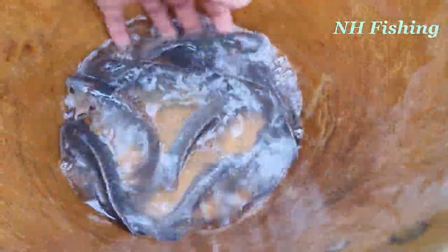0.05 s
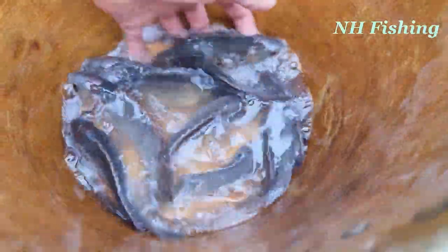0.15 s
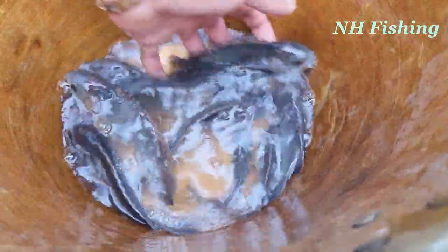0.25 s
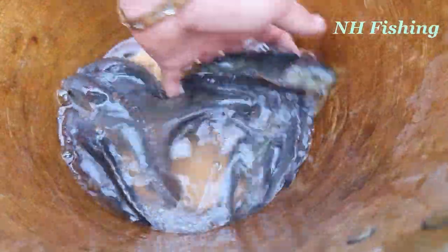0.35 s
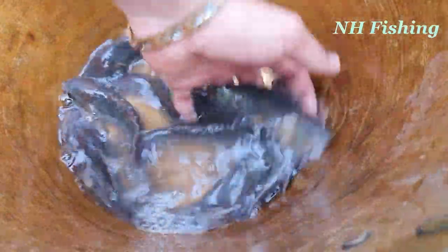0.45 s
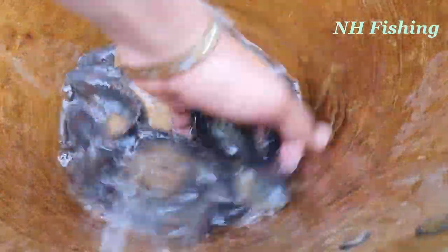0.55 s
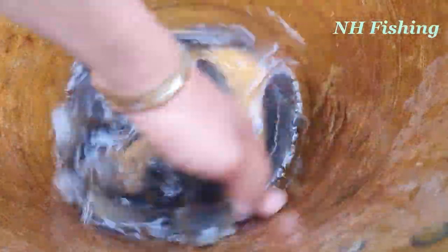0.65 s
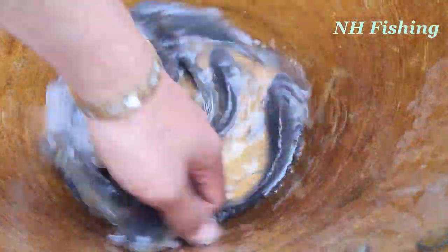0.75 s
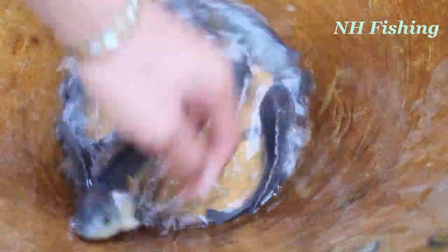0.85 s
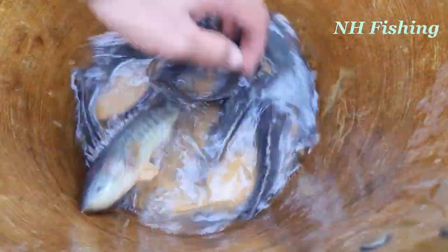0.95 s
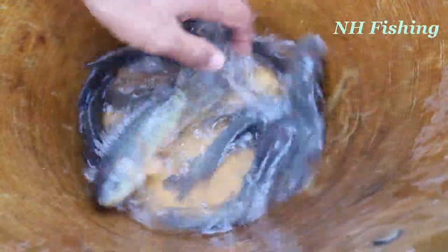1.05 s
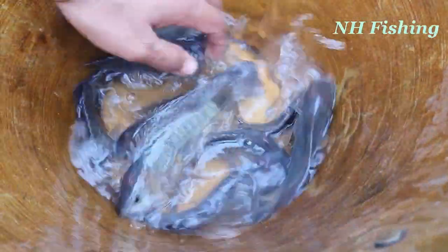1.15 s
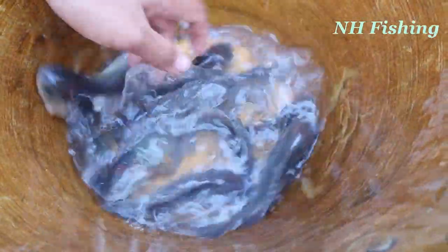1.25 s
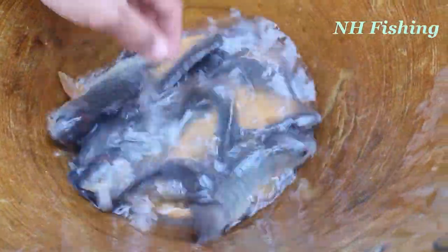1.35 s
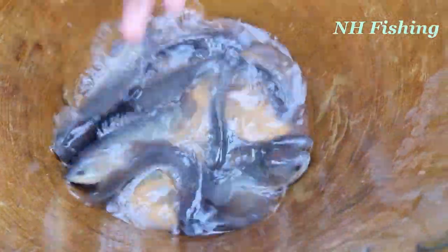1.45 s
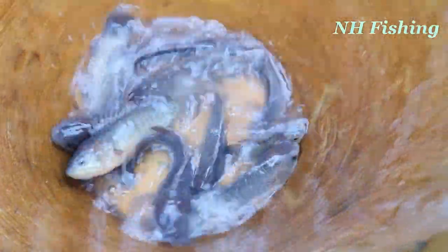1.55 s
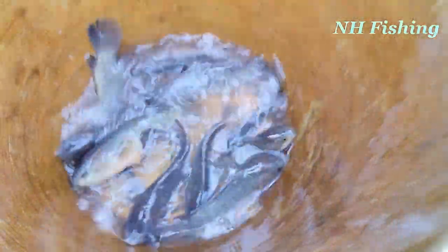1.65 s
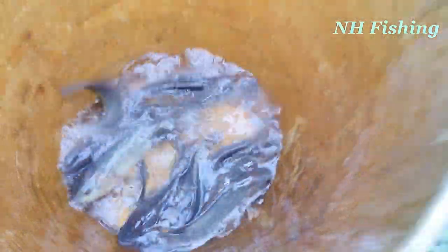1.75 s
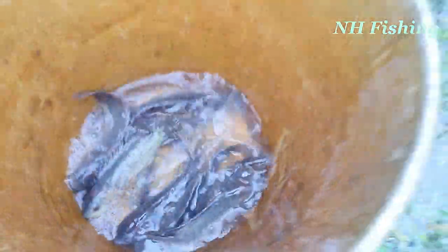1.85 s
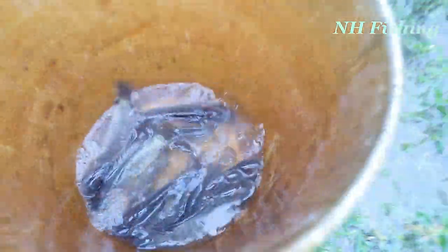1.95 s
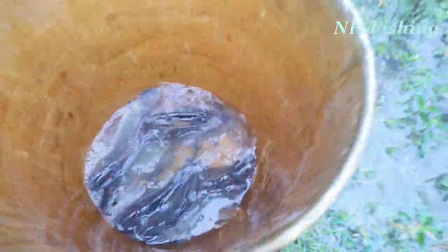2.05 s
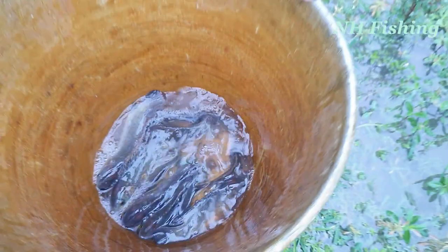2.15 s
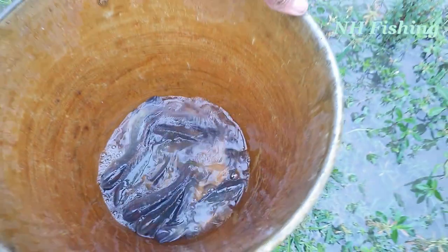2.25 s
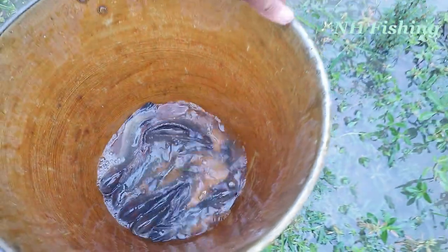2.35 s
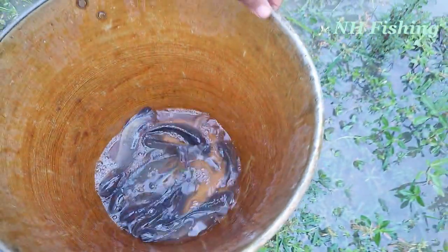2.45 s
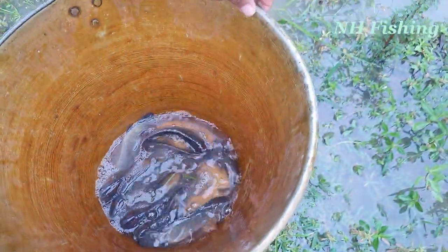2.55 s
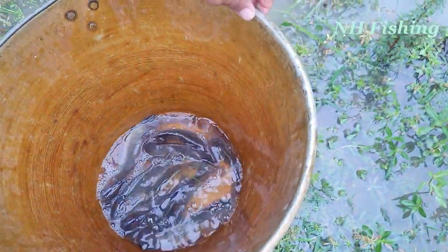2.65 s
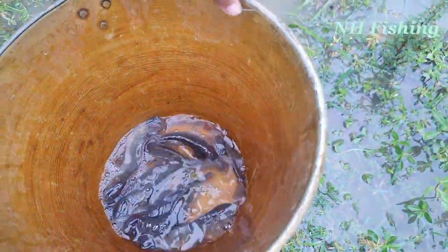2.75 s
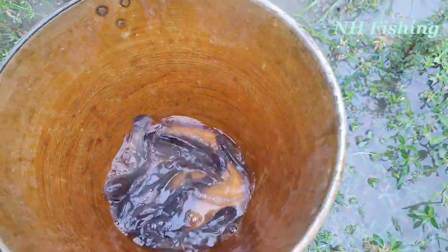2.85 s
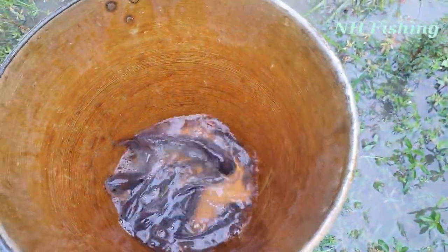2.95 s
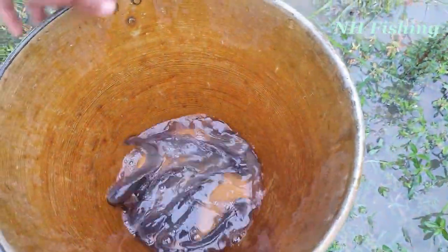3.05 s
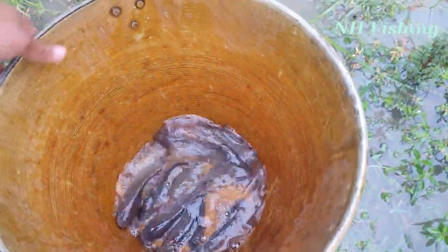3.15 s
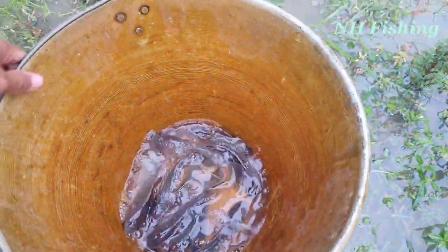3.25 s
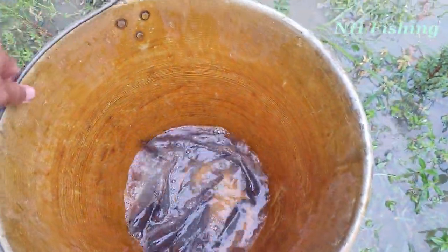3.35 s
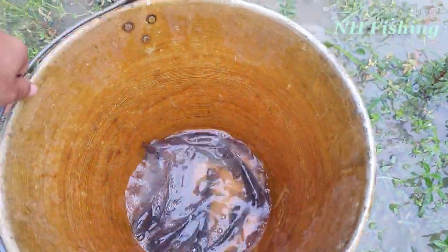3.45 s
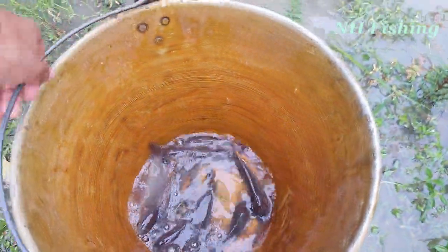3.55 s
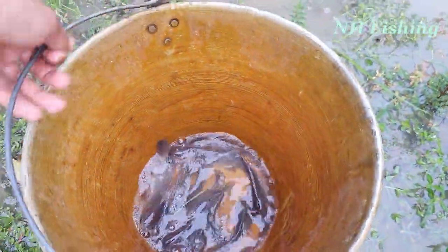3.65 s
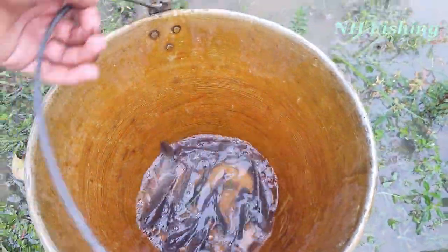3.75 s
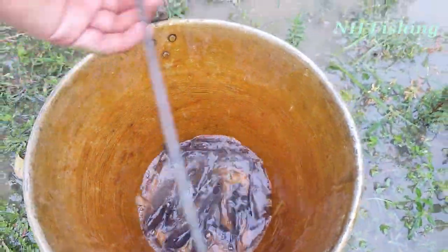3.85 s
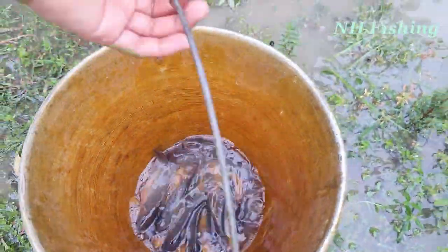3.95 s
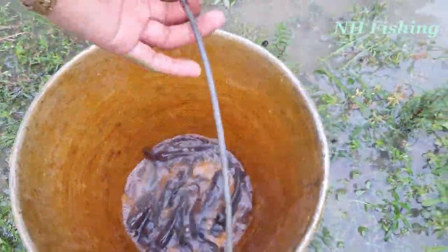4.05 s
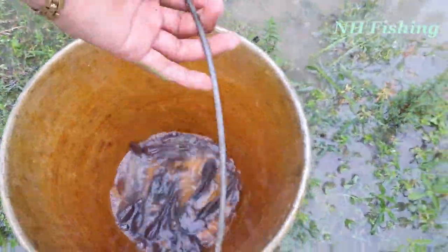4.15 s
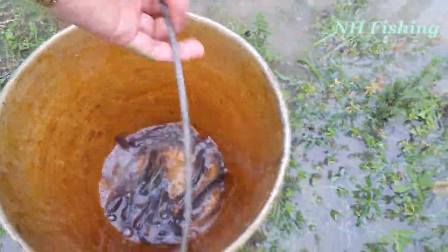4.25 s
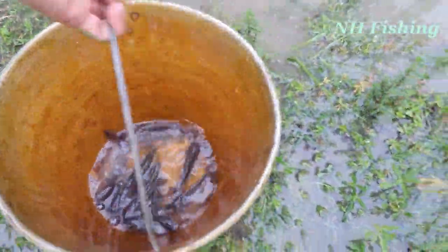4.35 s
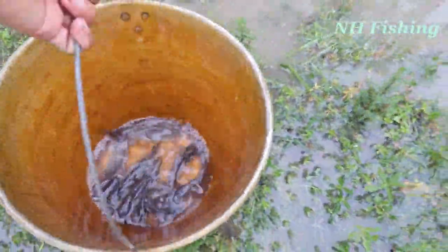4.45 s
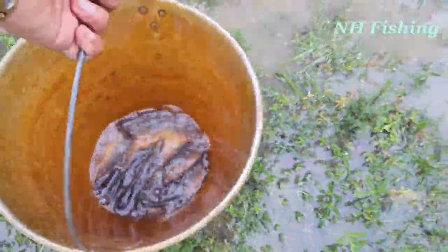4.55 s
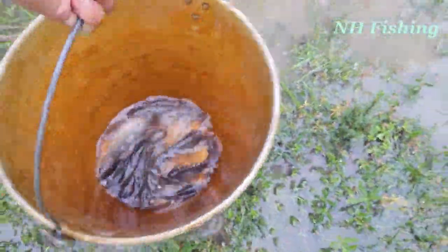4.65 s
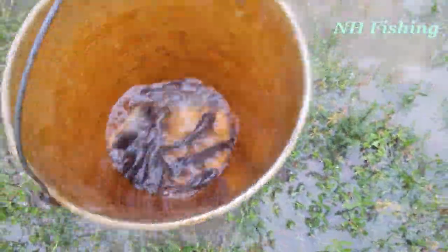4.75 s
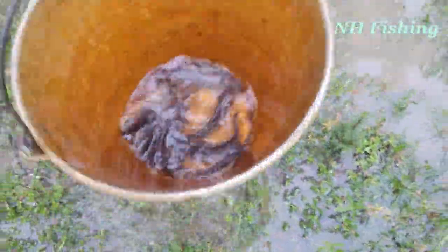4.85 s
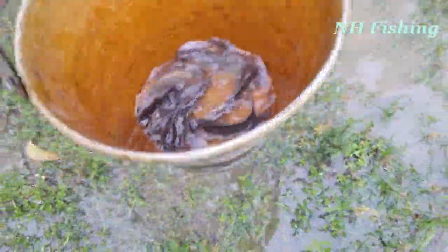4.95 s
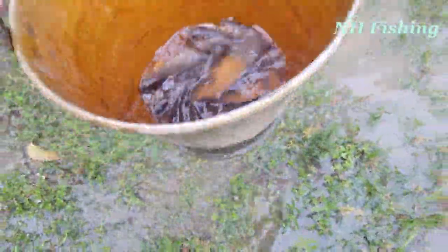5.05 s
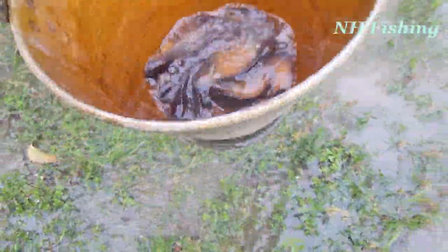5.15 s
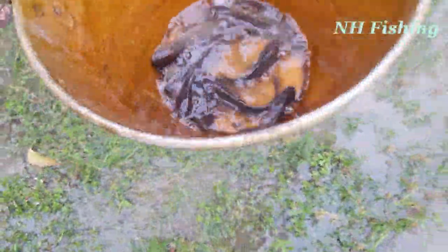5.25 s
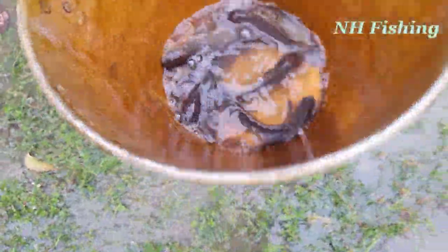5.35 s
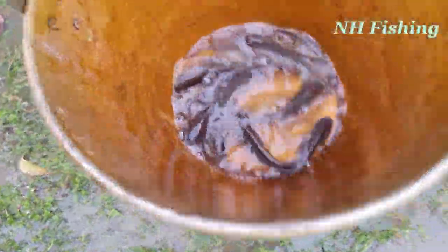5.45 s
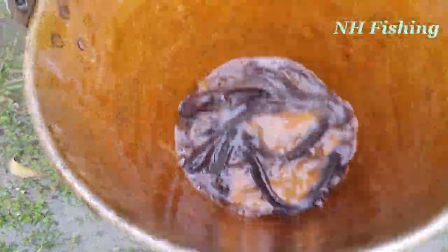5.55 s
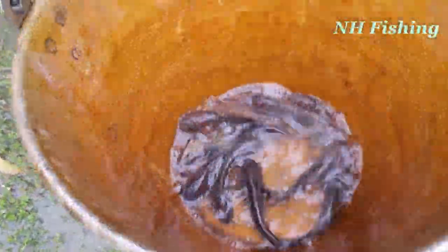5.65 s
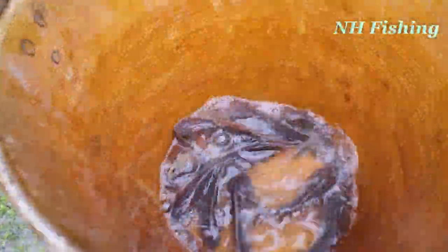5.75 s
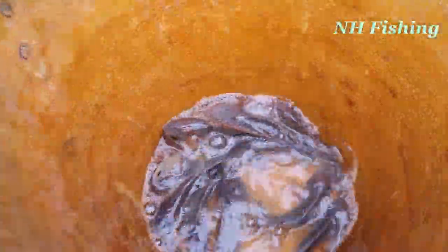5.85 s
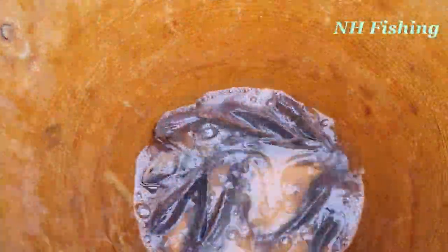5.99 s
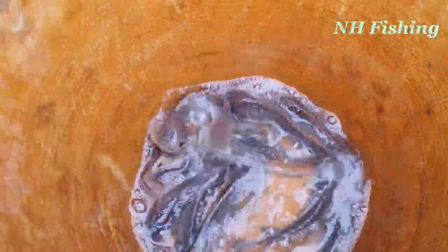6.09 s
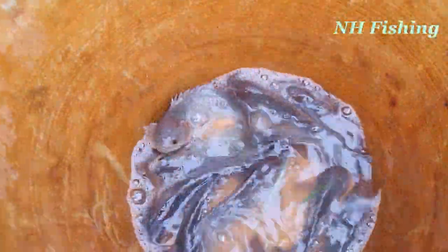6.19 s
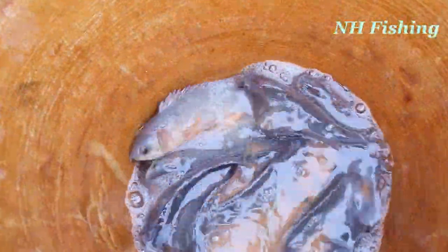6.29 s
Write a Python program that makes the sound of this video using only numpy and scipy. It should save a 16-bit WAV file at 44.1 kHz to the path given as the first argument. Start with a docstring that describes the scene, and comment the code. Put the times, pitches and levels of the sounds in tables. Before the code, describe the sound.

Wet slaps and bubbly splashes of squirming fish in a metal pail, followed by sharp handle clinks and a brief slosh outdoors.

```python
"""In a wet field, amid shrill insects and a low far-off rumble, small live fish squirm, slap and splash
in a little water in a metal bucket while a hand stirs: noise bursts, chirped bubbles, ringing modes.
A thin bird whistle falls at 2.3 s; from 3.5 s the wire handle swings up and clanks in its lugs, and a second
bird sings bending notes. At about 4.35 s the lifted bucket sloshes; the thin whistle returns at 5.3 s
amid the last slaps. The whistles are wavering sines; insects and rumble are filtered noise."""
import sys
import numpy as np
from scipy import signal
from scipy.fft import rfft, irfft, next_fast_len
from scipy.io import wavfile
from scipy.ndimage import uniform_filter1d, map_coordinates

SR = 44100
rng = np.random.default_rng(int(sys.argv[2]) if len(sys.argv) > 2 else 0)


def waveform_to_disk(signal):
    """Save audio, clipped to [-1, 1], as 16-bit WAV at the path in sys.argv[1]."""
    frames = np.transpose(np.atleast_2d(signal))
    scaled = np.clip(frames, -1, 1) * 32767
    samples = np.round(scaled).astype(np.int16)
    wavfile.write(sys.argv[1], SR, samples)


N = 278712

# Levels are relative, before each layer's mix gain.
# Tail slaps and squelches: t/s, splash resonance f/Hz, level/dB, thud/dB, spray/dB (last two re slap)
SLAPS = [(0.139, 2150, -30.5, -20, -31), (0.171, 3080, -32, -11, -27), (0.572, 4500, -29, -30, -10.5),
         (.637, 3000, -27.5, -31, -7), (.703, 3200, -29, -40, -34), (1.084, 3200, -26, -15.5, -22),
         (1.166, 850, -21, -10.5, -40), (1.1805, 3100, -13.5, -42, -16.5), (1.201, 4200, -21.5, -37, -15.5),
         (1.2565, 2370, -18, -33, -21.5), (1.262, 1400, -21, -29, -25), (1.278, 2740, -22, -22.5, -21),
         (1.32, 3000, -26.5, -28, -20), (1.333, 1730, -20, -16.5, -24.5), (1.428, 2100, -38, -30, -10),
         (1.735, 3730, -25.5, -19, -40), (1.921, 3120, -22, -13, -40), (1.9254, 3220, -16, -25, -40),
         (1.954, 3460, -28.5, -14.5, -31), (2.668, 1300, -44.5, -3, -39), (2.77, 2300, -32, -25, -47),
         (2.886, 1580, -30, -10.5, -45), (2.964, 800, -43, -3.5, -40), (3.054, 3520, -37.5, -33, -26),
         (3.226, 5000, -36.5, -14, -20), (4.546, 1000, -39, -4, -24), (5.561, 2100, -35, -30, -23),
         (5.756, 1330, -36.5, -13, -44), (6.046, 4540, -27.5, -32, -22), (6.216, 4570, -25.5, -26.5, -29),
         (6.274, 4080, -29.5, -30.5, -35)]
# Dry snaps of fins and bursting films: t/s, resonance f/Hz, level/dB
SNAPS = [(1.168, 1500, -39), (1.2584, 1210, -31.5), (1.525, 3130, -36), (4.449, 1390, -48),
         (6.307, 1870, -48)]
# Fish striking the bottom: t/s, level/dB
THUMPS = [(1.927, -31.5), (2.889, -46)]
# Hand or heavy body nudging the bucket: t/s, level/dB
BUMPS = [(0.747, -42), (2.801, -41)]
# Modes of the nudged bucket: f/Hz, level/dB, t60/s
BUMP_MODES = [(98, 11.5, 0.058), (261, -3.5, 0.12)]
# Modes of the water-loaded bottom: f/Hz, level/dB, t60/s
BOTTOM_MODES = [(266, -12.5, 0.5), (330, -3.5, 0.33), (474, -17.5, 0.52), (613, -2, 0.19), (1170, -1, .11),
                (1280, -4.5, 0.12)]
# Distinct bubble notes, low gloops to high blips; close rows may form one gloop:
# t/s, birth f/Hz, level/dB
BUBBLES = [(0.151, 315, -32.5), (.649, 1974, -21.5), (1.103, 810, -26.5), (1.114, 1015, -30),
           (1.133, 1140, -28), (1.1805, 3324, -10.5), (1.181, 1130, -23.5), (1.186, 2020, -21),
           (1.2, 3670, -21.5), (1.228, 1676, -18), (1.258, 898, -22.5), (1.261, 2090, -22),
           (1.333, 453, -28.5), (1.471, 3380, -33.5), (1.526, 2395, -23), (2.902, 800, -40),
           (2.985, 760, -46.5), (4.33, 1270, -27.5), (4.346, 2230, -30), (4.395, 1200, -34),
           (4.413, 2500, -39), (4.513, 794, -44), (4.548, 890, -41.5), (4.598, 560, -38.5),
           (4.815, 1780, -37), (6.237, 4750, -27.5)]
# Surges pushed by hand, writhing fish or lifted bucket:
# crest t/s, rise/s, fall/s, squelch level/dB, slosh level/dB, fizz level/dB
SURGES = [(.69, .45, .27, -47, -54, -58.5), (1.006, .06, .06, -45.5, -54.5, -64),
          (1.2, .12, .11, -36, -50, -48), (1.388, 0.066, .22, -46.5, -47.5, -61),
          (3.249, 0.0303, .26, -51, -57, -71), (3.559, .11, .09, -52, -54.5, -78),
          (4.349, .05, .06, -40, -50.5, -46), (4.489, .25, .21, -52.5, -51, -61.5),
          (5.571, .07, .45, -55, -59, -64), (6.29, .09, .1, -51.5, -61, -66)]
# Restless squirming between surges: t/s, squelch level/dB, fizz level/dB
SQUIRM = [(0, -60, -81), (1.7, -60.5, -71), (2.501, -69, -93), (3.301, -59.5, -71), (6.3, -60, -64.5)]
# Handle knocks in the lugs: t/s, wire resonance f/Hz, level/dB, thud/dB re knock, loss per rebound/dB
CLANKS = [(3.479, 2500, -33.5, -16, 5.5), (3.528, 4700, -25, -19.5, 12), (3.5789, 3260, -11, -31, 12),
          (3.692, 2770, -31.5, -21.5, 6), (3.908, 4470, -16.5, -26, 14), (3.967, 4640, -4, -31.5, 7.5),
          (4.166, 5380, -29, -20, 10), (4.269, 3400, -14.5, -30, 5.5), (4.3021, 4830, -8, -27.5, 4)]
# Wire scraping round in a lug: t/s, length/s, level/dB
SCRAPES = [(3.537, .033, -47.5), (3.93, 0.029, -44.5)]
# Modes of wall and handle: f/Hz, level/dB, t60/s
WALL_MODES = [(273.4, 1, 0.081), (1980, 5.5, 0.083), (2910, 0, 0.11), (4440, 7, 0.051), (4554, 9.5, 0.053),
              (5100, 12, 0.031)]
# First bird, thin slide then softer hold: t/s, slide level/dB, held f/Hz, held level/dB
THIN_CALLS = [(2.289, -45, 5140, -53), (5.318, -48, 5350, -61)]
# Second bird, bending notes: t/s, length/s, first f/Hz, middle f/Hz, last f/Hz, level/dB
FLUTED_NOTES = [(3.718, 0.05, 3190, 3175, 3490, -40.5), (3.889, 0.035, 2590, 2536, 2510, -42.5),
                (3.925, 0.024, 2836, 3110, 2800, -36.5), (4.056, 0.18, 2720, 2193, 2570, -42)]
# Spectra of splash, thud and spray: f/Hz, level/dB
SPLASH_SPECTRUM = [(300, -81), (800, -25), (1300, 7.5), (2300, 5.5), (3600, 2), (5500, 2.5), (7500, -3.5),
                   (11000, -82)]
THUD_SPECTRUM = [(70, 1), (170, -6.5), (280, -0.5), (450, -6), (800, -5.5), (1200, -7.5), (2200, -38)]
SPRAY_SPECTRUM = [(3500, -4), (6500, 4), (9500, 2.5), (16000, -5)]
# Spectra of stirred water, low slosh to fine fizz: f/Hz, level/dB
SLOSH_SPECTRUM = [(120, -20), (300, -1.5), (1200, -9), (2000, -46)]
SQUELCH_SPECTRUM = [(600, -8.5), (1300, -0.5), (2000, 0.5), (3200, -2.5), (7000, -11.5), (11000, -28.5)]
FIZZ_SPECTRUM = [(4000, -38), (7000, 17.5), (16000, 11.5)]
# Spectrum of the steel knock: f/Hz, level/dB
STEEL_SPECTRUM = [(400, -21.5), (1100, -14), (2900, 3), (4500, -1), (5600, -3), (7500, -11.5), (11000, -41)]
# Spectra of the field, rumbling air and insects: f/Hz, level/dB
AIR_SPECTRUM = [(20, -63), (50, -5.5), (120, 0.5), (165, -11.5), (270, -11.5), (520, -16.5), (800, -31),
                (1550, -22), (1870, -13.5), (2250, -26), (3700, -22), (6000, -53)]
INSECT_SPECTRUM = [(4300, -20.5), (5300, -1), (6500, -19), (7600, -9.5), (8700, 1), (9500, -9),
                   (11500, -34)]
# Left-right correlation of diffuse sound: f/Hz, likeness (0 to 1)
LIKENESS = [(30, .25), (110, .88), (380, .87), (1300, 0)]
# Ebb of the rumble: t/s; level/dB
EBB_S, EBB_DB = [4.3, 5.7], [-51.8, -54.3]
# Drifting left-right balance of the sounds inside the bucket: t/s; left re right/dB
SIDE_S, SIDE_DB = [.6, 1.2, 1.55, 1.9], [-2.5, -4.5, -3.5, -2.0]

BUBBLE_T60_1KHZ_S, BUBBLE_LIFE_POWER = 0.04, 0.14  # t60 falls as this power of f
BUBBLE_RISE_OCT = .2  # climb over t60; mean value in swarms
SURGE_SHAPE = 1.2  # >1: more pointed than a sine arch
REST_SLOSH_DB = -6  # squirming slosh re its squelch
REBOUND_COUNT = 2  # after first contact
REBOUND_S, TICK_DB = .0052, -31  # nominal spacing; bright tick re knock
SLIP_S = 0.006  # nominal slip spacing
THIN_START_HZ, THIN_FALL_HZ_PER_S, THIN_LENGTH_S, THIN_SOFTEN_S = 6250, 15200, 0.19, 0.029
QUAVER_HZ, QUAVER_PER_S = 50, 70  # random depth scale; knots per second
GLIDE_S, BEND_POWER, MIDDLE_DB = 0.018, 3.3, -1  # glide time constant; bend lateness; mid-note dip
FIELD_T60_S = 0.81  # echo from the trees
TOP_HZ = 15950
RING_S = np.arange(SR // 2) / SR  # time since a blow


def fish():
    """Tails slap water: smack, splash, thud, spray; body blows ring the bottom, nudges the bucket."""
    out = np.zeros((2, N))
    for s, hz, db, thud_db, spray_db in SLAPS:
        spectrum = peaked(SPLASH_SPECTRUM, hz, boost_db=12.5, octaves=0.66)
        splash = amp(-14.0) * burst(spectrum, t60=0.071, attack=0.00095, direct=0.43)
        thud = amp(thud_db - 3.0) * burst(THUD_SPECTRUM, t60=0.16, attack=0.00065, direct=0.82)
        spray = amp(spray_db) * burst(SPRAY_SPECTRUM, t60=0.04, attack=0.002, direct=2.5)
        add(out, s, amp(db) * (splash + thud + spray))
        add(out, s + 0.001495, amp(db - 26.0) * smack(hz))
    for s, hz, db in SNAPS:
        add(out, s, amp(db) * smack(hz) * pan(-1))
    for s, db in THUMPS:
        add(out, s, amp(db) * ring(BOTTOM_MODES, waver=0.015))
    for s, db in BUMPS:
        add(out, s, amp(db) * ring(BUMP_MODES, waver=0))
    return out


def smack(hz):
    """Sharp crack of wet skin meeting or leaving the water."""
    spectrum = peaked(SPLASH_SPECTRUM, hz, boost_db=10.5, octaves=0.99)
    return burst(spectrum, t60=0.0079, attack=0.00052, direct=0)


def bubbles():
    """Distinct bubble notes driven under by slaps and sloshing; higher ones die sooner."""
    out = np.zeros((2, N))
    for s, hz, db in BUBBLES:
        t60 = BUBBLE_T60_1KHZ_S * (1000 / hz) ** BUBBLE_LIFE_POWER
        add(out, s, amp(db + 2) * bubble(hz, t60, BUBBLE_RISE_OCT, RING_S))
    return out


def bubble(hz, t60, rise_oct, t):
    """Trapped air rings and climbs in pitch as it nears the surface."""
    pitch = hz * 2 ** (rise_oct * np.minimum(t / t60, 1))
    lag = np.array([[-1], [1]]) * min(hz / 2200, .8)  # left-right phase/rad
    envelope = amp(-60 * t / t60) * (1 - np.exp(-(t / 0.0011) ** 2))
    return envelope * np.sin(2 * np.pi * np.cumsum(pitch) / SR + lag)


def water():
    """Slippery bodies work the water: gurgling slosh, squelching films, fine fizz."""
    squelch_db, slosh_db, fizz_db = stirring()
    wash = crackle(SLOSH_SPECTRUM, rate=150, spike_db=3.0, t60=0.05, smooth=0.28)
    slosh = amp(slosh_db - 6.5) * wash
    films = crackle(SQUELCH_SPECTRUM, rate=260, spike_db=4, t60=0.028, smooth=0.65)
    films = patchy(films, depth_db=3)
    squelch = amp(squelch_db + 2.34 + 0.85 * wobble(20)) * films
    fizz = amp(fizz_db + 2) * crackle(FIZZ_SPECTRUM, rate=70, spike_db=5, t60=.008, smooth=1)
    gurgle = swarm(slosh_db + 2.0, hz=994, scatter=0.487, cycles=25, count=300)
    trickle = swarm(squelch_db + 6.5, hz=2805, scatter=0.344, cycles=84, count=420)
    return slosh + squelch + fizz + gurgle + trickle


def stirring():
    """Squelch, slosh and fizz levels/dB: surge power adds to that of the squirming."""
    t = np.arange(N) / SR
    s, *columns = np.transpose(SQUIRM)
    squelch_db, fizz_db = [np.interp(t, s, c) for c in columns]
    power = amp([squelch_db, squelch_db + REST_SLOSH_DB, fizz_db]) ** 2
    for crest, rise, fall, *levels_db in SURGES:
        ramp = np.interp(t, [crest - rise, crest, crest + fall], [0, 1, 0])
        arch = np.sin(np.pi / 2 * ramp) ** SURGE_SHAPE
        power += (amp(levels_db)[:, None] * arch) ** 2
    return 10 * np.log10(power)


def crackle(spectrum, rate, spike_db, t60, smooth):
    """Tiny wet pops of uneven size, echoing in the bucket, on a smooth wash."""
    count = int(rate * N / SR)
    when = rng.integers(0, N, count)
    size = amp(spike_db * np.minimum(rng.exponential(size=count), 3.5))
    pops = np.zeros((2, N))
    for group in np.array_split(np.arange(count), 10):  # one echo pattern per group
        echo = rng.standard_normal((2, SR // 10)) * amp(-60 * RING_S[:SR // 10] / t60)
        impulses = np.bincount(when[group], size[group], N)
        pops += signal.fftconvolve(impulses[None], echo, axes=1)[:, :N]
    return spread(unit(pops) + smooth * rng.standard_normal((2, N)), spectrum)


def patchy(pair, depth_db):
    """Pockets between bodies open and close: brief resonances come and go."""
    z = signal.stft(pair)[2]
    field = rng.standard_normal(z.shape[1:])
    field = uniform_filter1d(field, size=3, axis=0)
    field = uniform_filter1d(field, size=10, axis=1)
    return unit(signal.istft(z * amp(depth_db * unit(field)))[1][:, :N])


def swarm(level_db, hz, scatter, cycles, count):
    """Many passing bubbles of chance pitch, born denser and louder under stronger stirring."""
    out = np.zeros((2, N))
    births = np.cumsum(np.sqrt(amp(level_db / 2)))
    quantiles = (np.arange(count) + rng.random(count)) / count
    when = np.searchsorted(births / births[-1], quantiles)
    draws = np.clip(rng.standard_normal((count, 3)), -2, 2)
    for start, (offset, strength, rise) in zip(when, draws):
        pitch = min(hz * np.exp(scatter * offset), SR / 4)
        t60 = cycles / np.sqrt(pitch * hz)
        sound = bubble(pitch, t60, BUBBLE_RISE_OCT * (1 + rise / 2), RING_S[:SR // 10])
        add(out, start / SR, amp(level_db[start] + 3.0 * strength) * sound)
    return out


def handle():
    """Wire handle strikes its lugs, rebounds within milliseconds and rings the wall."""
    out = np.zeros((2, N))
    for s, hz, db, thud_db, loss_db in CLANKS:
        steel = peaked(STEEL_SPECTRUM, hz, boost_db=6.5, octaves=0.22)
        for k in np.arange(REBOUND_COUNT + 1):
            clack = burst(steel, t60=0.066, attack=0.0012, direct=2.7)
            contact_s = s + .0005 + k * REBOUND_S * rng.uniform(.9, 1.1)
            add(out, contact_s, amp(db - 13.5 - k * loss_db) * clack)
        thud = amp(thud_db) * burst(THUD_SPECTRUM, t60=0.2, attack=0.0042, direct=0.25)
        tick = amp(TICK_DB) * burst(SPRAY_SPECTRUM, t60=0.059, attack=0.0014, direct=0.91)
        add(out, s, amp(db) * (thud + tick))
        add(out, s + 0.0024, amp(db - 23.0) * ring(WALL_MODES, waver=.004))
    return (out + scrapes()) * pan(-1.6)


def scrapes():
    """Wire slips through its lug in a quick uneven rattle."""
    out = np.zeros((2, N))
    for s, length, db in SCRAPES:
        for slip in np.arange(0, length, SLIP_S):
            slip_s = s + slip + SLIP_S * rng.uniform(-.5, 0.3)
            gain = amp(db + rng.normal(0, 2.5))
            add(out, slip_s, gain * burst(STEEL_SPECTRUM, t60=0.057, attack=0.00055, direct=2))
    return out


def burst(spectrum, t60, attack, direct):
    """Short crack and its dense reflections in the bucket; rms 1 over the first 20 ms."""
    decay = amp(-60 * RING_S / t60) + direct * amp(-60 * RING_S / 0.0061)
    envelope = decay * (1 - np.exp(-(RING_S / attack) ** 2))
    noise = ripple(rng.standard_normal((2, len(RING_S))), depth_db=2.5, width_hz=90)
    sound = envelope * spread(noise, spectrum)
    return sound / np.sqrt(np.mean(sound[:, :SR // 50] ** 2))


def ripple(pair, depth_db, width_hz):
    """Chance spectral peaks and dips: standing waves met from one spot in the bucket."""
    knots = rng.standard_normal((2, SR // 40))

    def response(hz):
        curves = [map_coordinates(k, [hz / width_hz], order=1) for k in knots]
        return amp(depth_db * np.array(curves))
    return filtered(pair, response)


def ring(modes, waver):
    """Modes of chance strength, pitch wavering as the water moves; higher ones differ in phase by side."""
    hz, db, t60 = np.transpose(modes)[:, :, None]
    level = amp(db + rng.normal(0, 1.0, hz.shape) - 60 * RING_S / t60)
    phase = rng.uniform(-np.pi, np.pi, (2, len(hz), 1)) * np.minimum(hz / 2500, 1)
    drift = np.array([wobble(80)[:len(RING_S)] for _ in hz])
    turns = np.cumsum(hz * (1 + waver * drift), axis=1) / SR
    modes_sum = np.sum(level * np.sin(2 * np.pi * turns + phase), axis=1)
    return modes_sum * (1 - np.exp(-RING_S / 0.0011))


def birds():
    """Two birds call across the field; the trees echo them."""
    out = np.zeros((2, N))
    for s, *call in THIN_CALLS:
        add(out, s, pan(3.5) * thin_call(*call))
    for s, *note in FLUTED_NOTES:
        add(out, s, pan(-1.8) * fluted_note(*note))
    tail = rng.standard_normal((2, len(RING_S))) * amp(-60 * RING_S / FIELD_T60_S)
    echo = signal.fftconvolve(out, tail / np.linalg.norm(tail[0]), axes=1)[:, :N]
    return out + amp(-3.5) * echo


def thin_call(slide_db, held_hz, held_db):
    """Pitch falls steadily to a held note, level softening around arrival; it quavers throughout."""
    t = np.arange(0, THIN_LENGTH_S, 1 / SR)
    arrival = (THIN_START_HZ - held_hz) / THIN_FALL_HZ_PER_S
    hz = np.maximum(THIN_START_HZ - THIN_FALL_HZ_PER_S * t, held_hz)
    hz = hz + QUAVER_HZ * wobble(QUAVER_PER_S)[:len(t)]
    knots_s = [arrival - THIN_SOFTEN_S, arrival + THIN_SOFTEN_S, THIN_LENGTH_S]
    db = np.interp(t, knots_s, [slide_db, held_db, held_db - 0.5])
    return whistle(hz, db + 1.0 * wobble(QUAVER_PER_S)[:len(t)], waver=0.0047)


def fluted_note(length, first_hz, middle_hz, last_hz, db):
    """Quick glide to the middle pitch, late bend to the last; softest mid-note."""
    t = np.arange(0, length, 1 / SR)
    glide = (first_hz - middle_hz) * np.exp(-t / GLIDE_S)
    bend = (last_hz - middle_hz) * (t / length) ** BEND_POWER
    level_db = db + MIDDLE_DB * np.sin(np.pi * t / length)
    return whistle(middle_hz + glide + bend, level_db, waver=0.0036)


def whistle(hz, db, waver):
    """Nearly pure bird note: a slightly unsteady sine along a pitch and level."""
    pitch = hz * (1 + waver * wobble(122)[:len(hz)])
    envelope = amp(db) * signal.windows.tukey(len(hz), .08)
    note = envelope * np.sin(2 * np.pi * np.cumsum(pitch) / SR)
    return note[None]


def outdoors():
    """Filtered noise: throbbing far-off rumble that slowly ebbs, steady insect chorus."""
    ebb_db = np.interp(np.arange(N) / SR, EBB_S, EBB_DB)
    air = amp(ebb_db + 2 * wobble(18)) * spread(rng.standard_normal((2, N)), AIR_SPECTRUM)
    insects = amp(-60.5) * spread(rng.standard_normal((2, N)), INSECT_SPECTRUM)
    return air * pan(3.2) + insects


def amp(db):
    """Decibels to gain."""
    return 10 ** (np.asarray(db) / 20)


def unit(x):
    """Scale to rms 1."""
    return x / np.sqrt(np.mean(x ** 2) + 1e-20)


def along(points, hz):
    """Interpolate (f/Hz, value) points on a log axis."""
    f, v = np.transpose(points)
    return np.interp(np.log(hz + 1), np.log(f + 1), v)


def peaked(spectrum, centre_hz, boost_db, octaves):
    """Lay one broad resonance on a spectrum."""
    hz = np.fft.rfftfreq(1024, 1 / SR)[1:]
    bump_db = boost_db * np.exp(-(np.log2(hz / centre_hz) / octaves) ** 2)
    return np.transpose([hz, along(spectrum, hz) + bump_db])


def wobble(rate):
    """Smooth random curve, rate knots per second."""
    knots = rng.standard_normal(int(N * rate / SR) + 4)
    return map_coordinates(knots, [np.arange(N) * rate / SR])


def filtered(x, response):
    """Filter x by a response of f/Hz."""
    n = x.shape[-1]
    m = next_fast_len(n + 8192)
    return irfft(rfft(x, m) * response(np.fft.rfftfreq(m, 1 / SR)), m)[..., :n]


def spread(pair, spectrum):
    """Colour two unrelated signals into stereo of rms 1: bass mostly alike, treble unrelated."""
    def response(hz):
        turn = np.arccos(np.clip(along(LIKENESS, hz), -1, 1)) / 2
        return amp(along(spectrum, hz)) * np.array([np.cos(turn), np.sin(turn)])
    mid, side = filtered(pair, response)
    return unit(np.array([mid + side, mid - side]))


def pan(db):
    """Left and right gains for a left-re-right level/dB."""
    gains = amp(np.array([[db], [-db]]) / 2)
    return unit(gains)


def add(out, s, sound):
    """Mix a sound in at time s."""
    start = max(round(s * SR), 0)
    out[:, start:start + sound.shape[1]] += sound[:, :max(N - start, 0)]


def scene():
    """Bucket close by, the balance of its fish and water sounds drifting between left and right; the field
    around it."""
    side_db = np.interp(np.arange(N) / SR, SIDE_S, SIDE_DB)
    inside = (fish() + bubbles() + water()) * amp(np.array([side_db, -side_db]) / 2)
    return inside + handle() + birds() + outdoors()


def record(dry):
    """Roll off the deepest bass below 42 Hz and cut steeply above the band limit."""
    def response(hz):
        bass = hz ** 2 / np.sqrt(hz ** 4 + 42 ** 4)
        return bass / np.sqrt(1 + (hz / TOP_HZ) ** 160)
    return filtered(dry, response)


dry = scene()
out = record(dry)
waveform_to_disk(out)
```